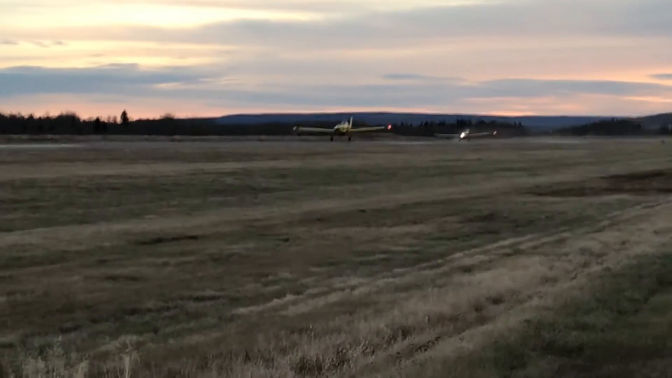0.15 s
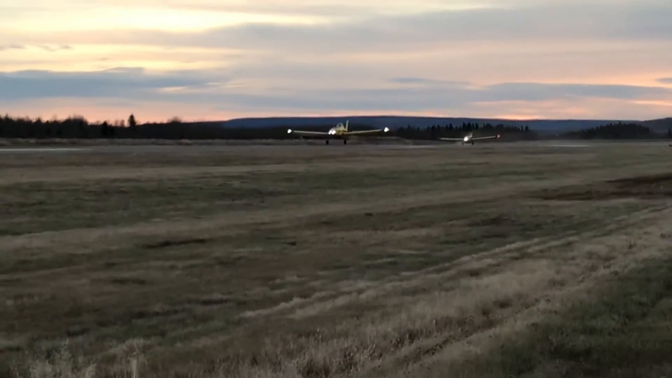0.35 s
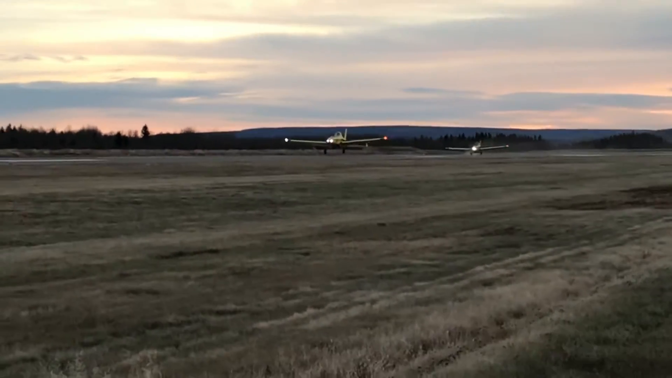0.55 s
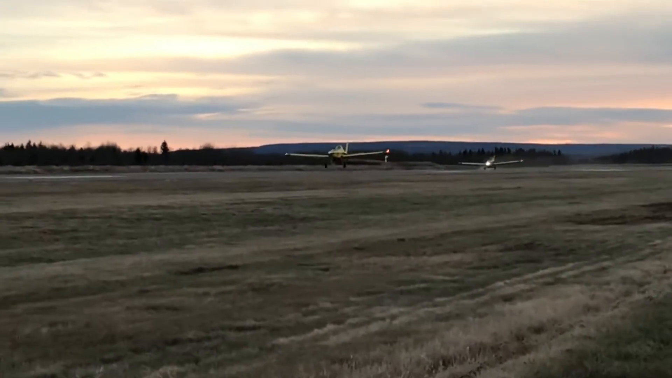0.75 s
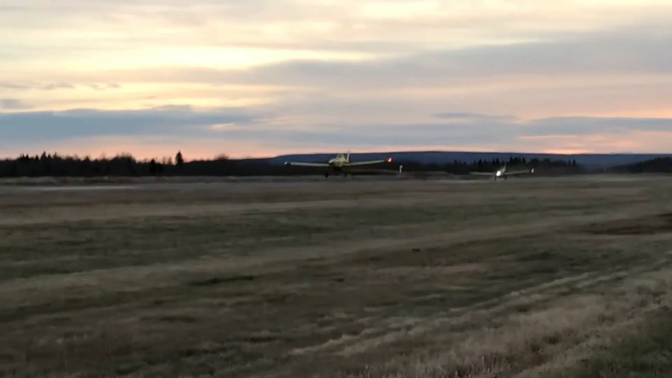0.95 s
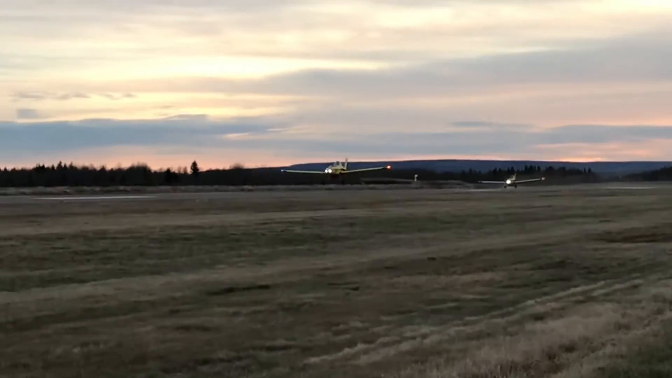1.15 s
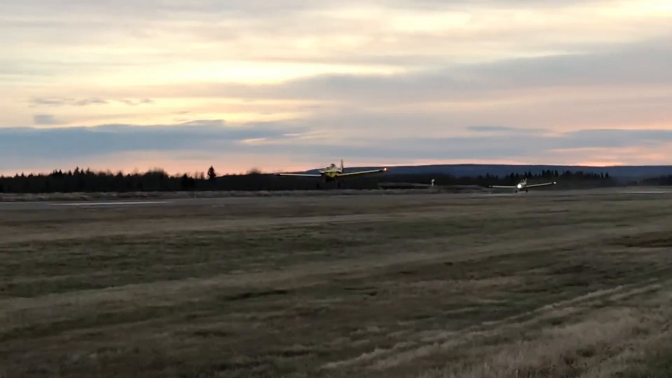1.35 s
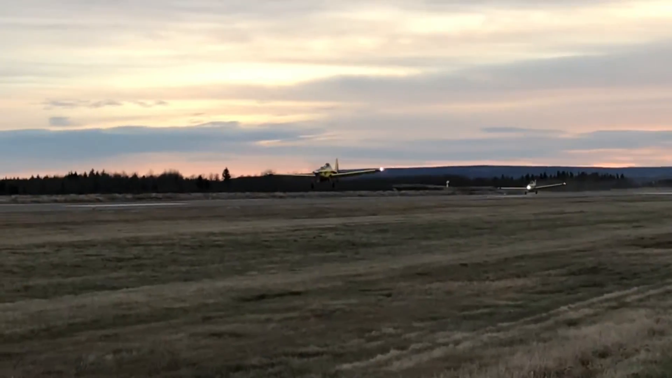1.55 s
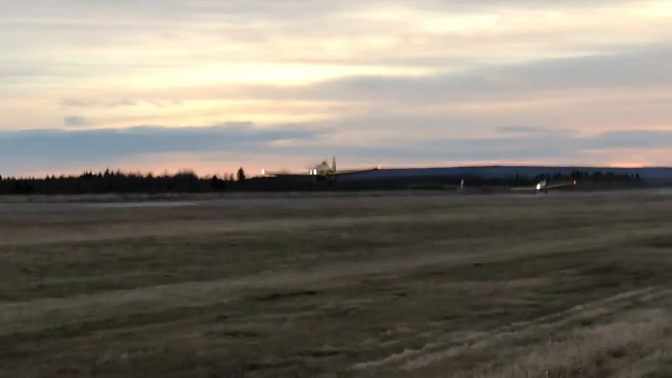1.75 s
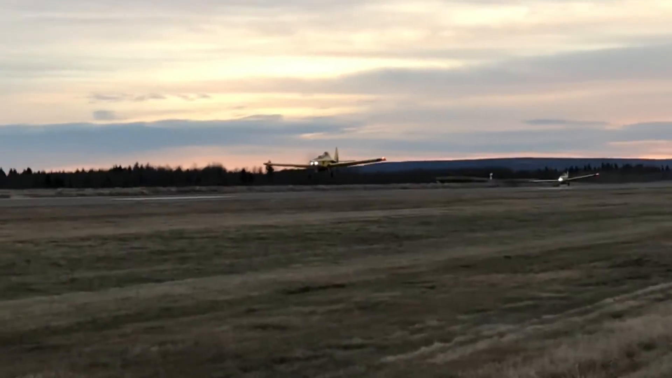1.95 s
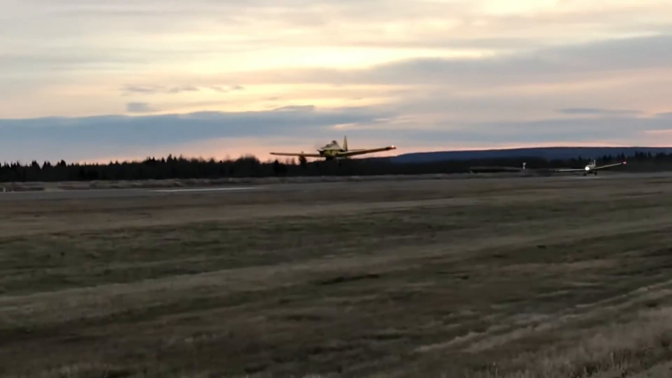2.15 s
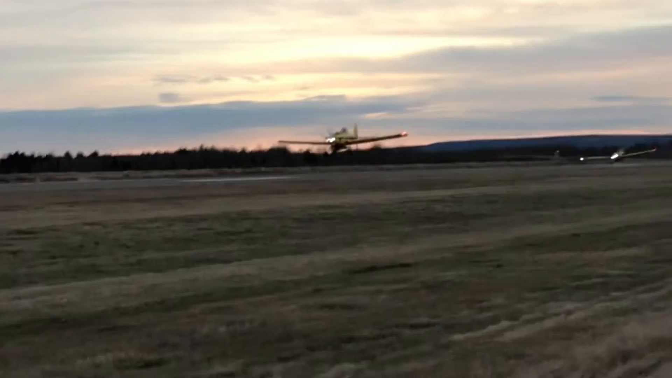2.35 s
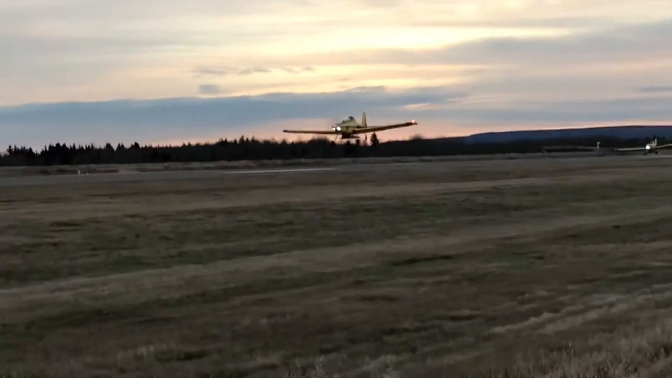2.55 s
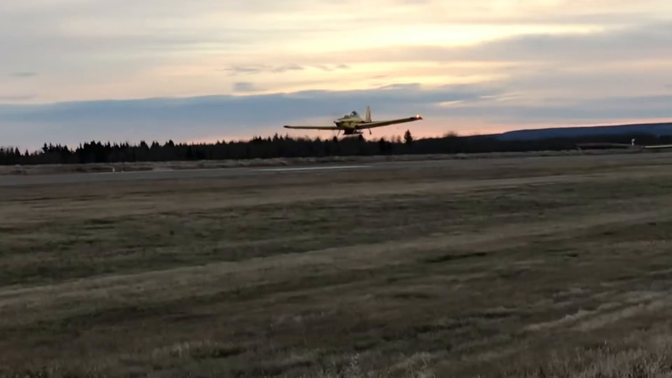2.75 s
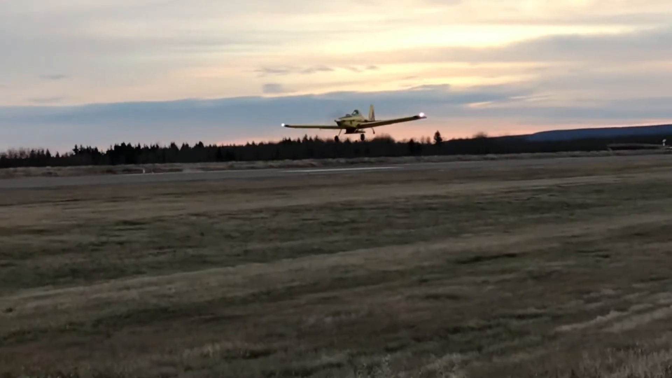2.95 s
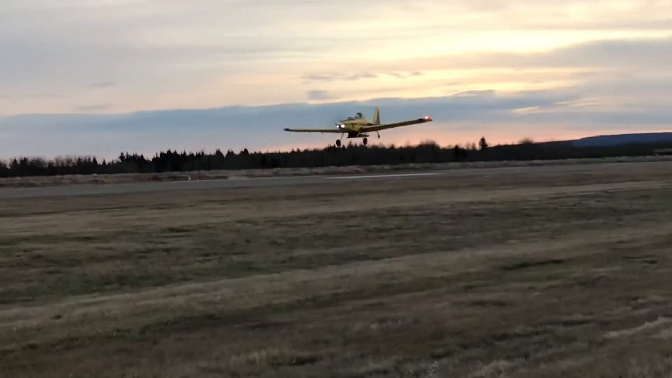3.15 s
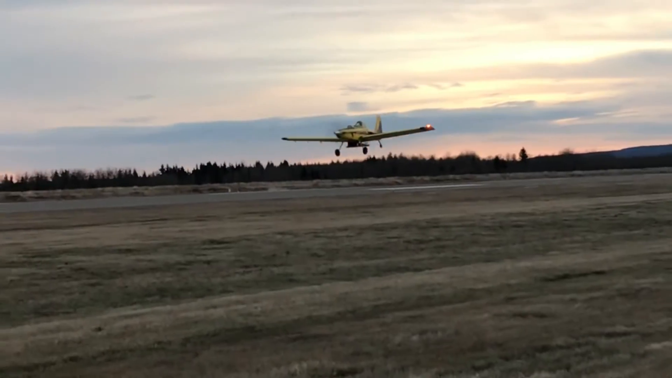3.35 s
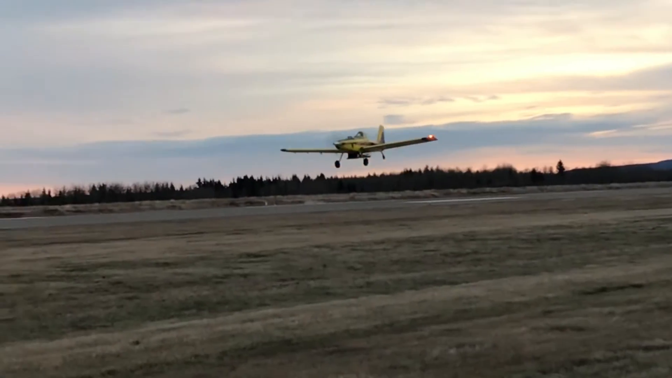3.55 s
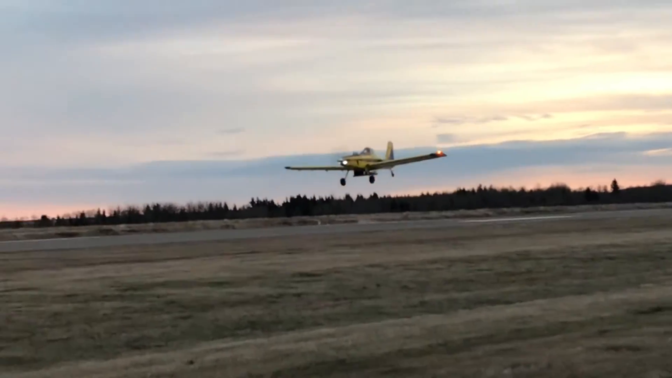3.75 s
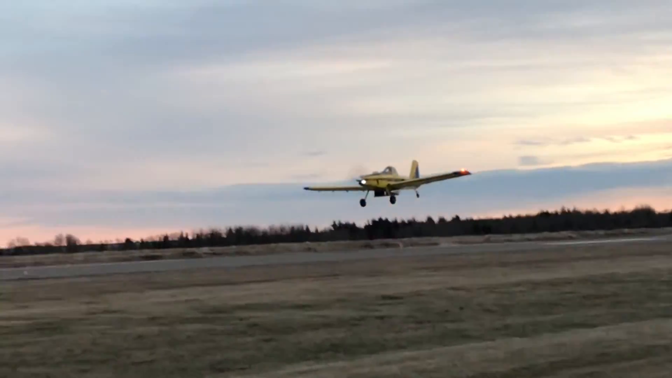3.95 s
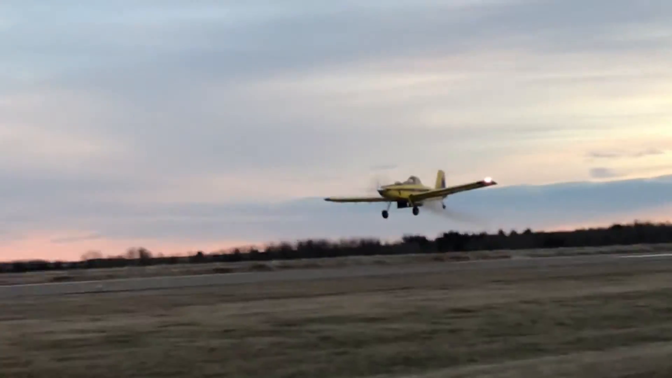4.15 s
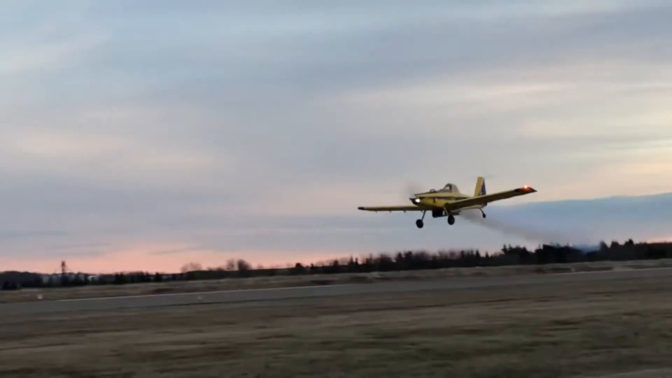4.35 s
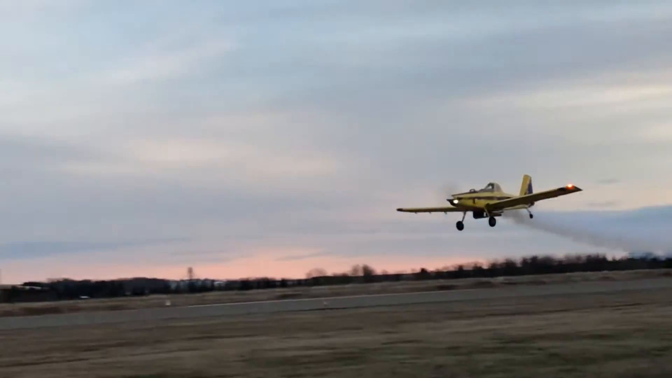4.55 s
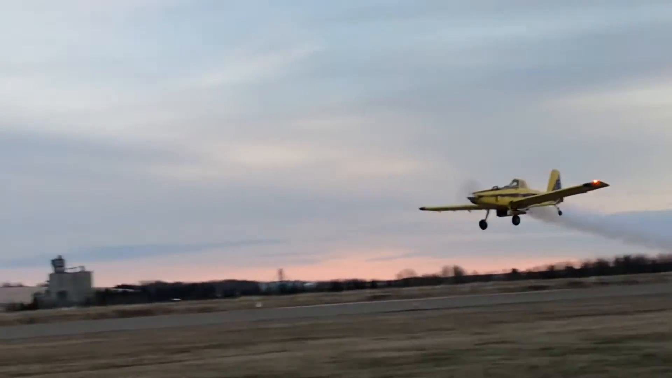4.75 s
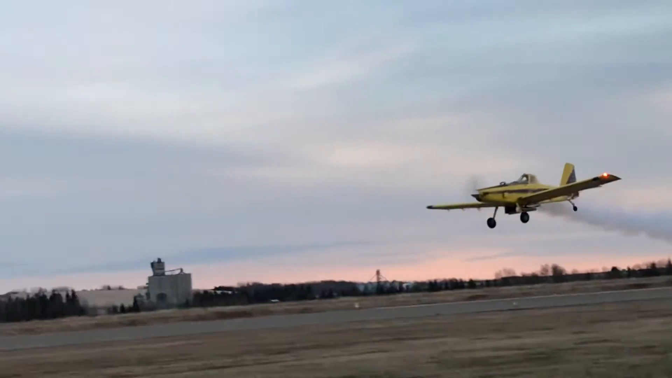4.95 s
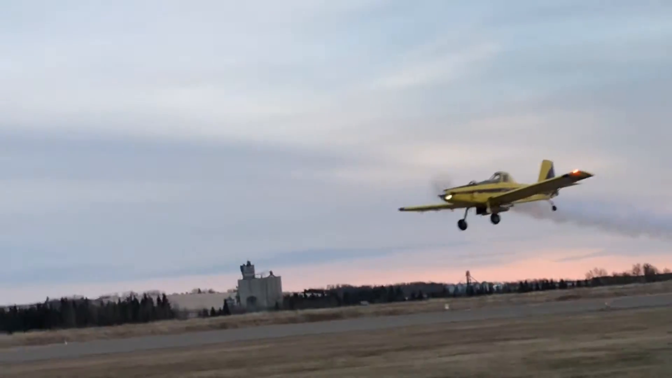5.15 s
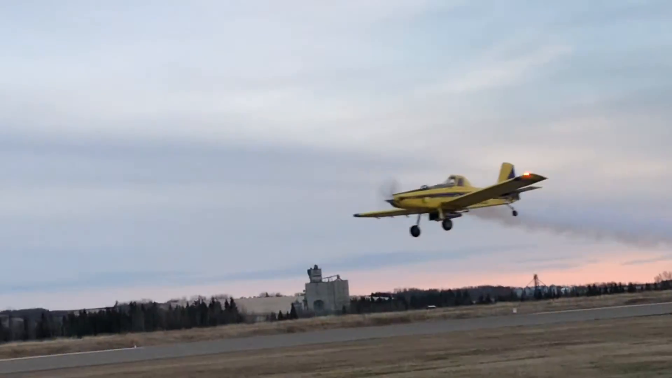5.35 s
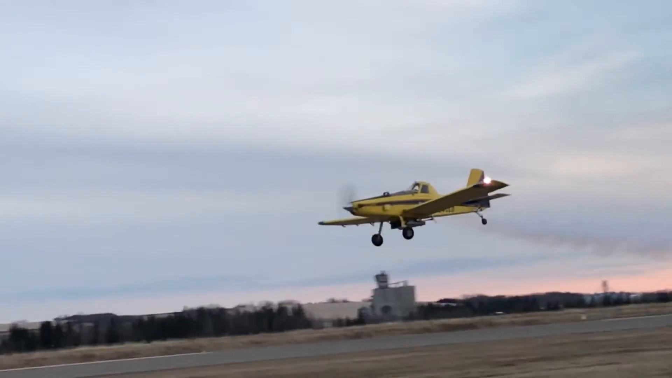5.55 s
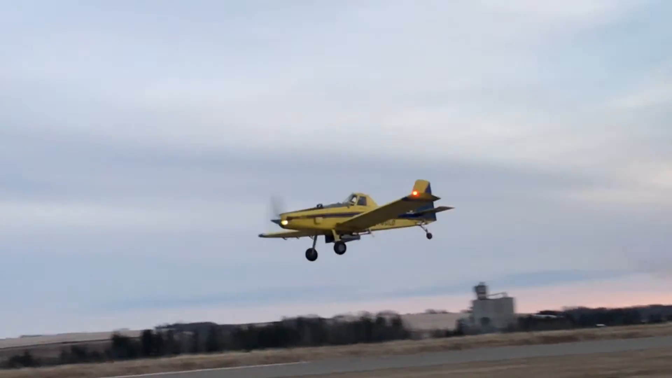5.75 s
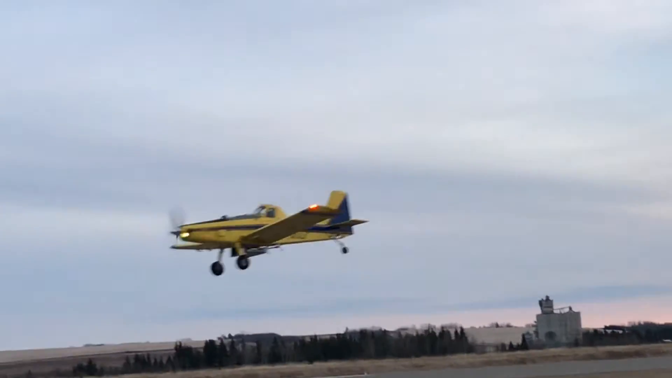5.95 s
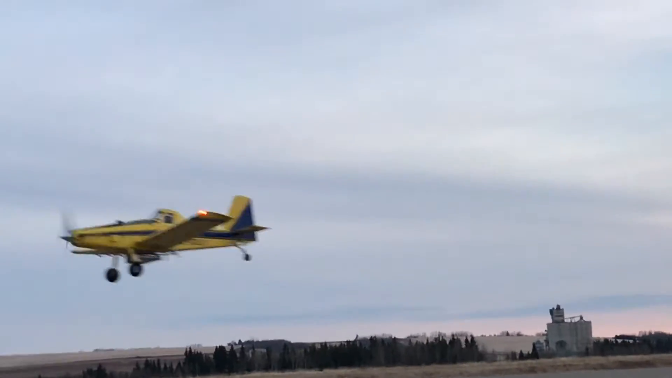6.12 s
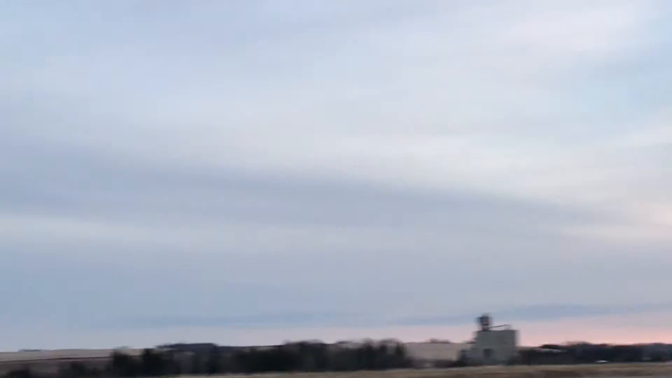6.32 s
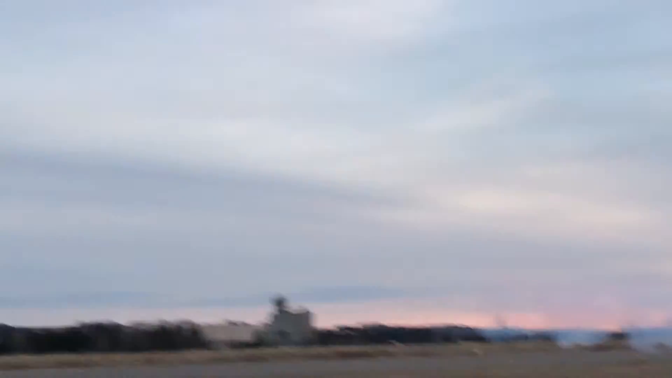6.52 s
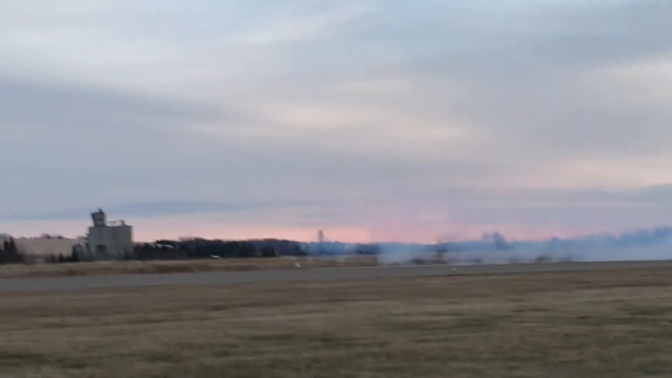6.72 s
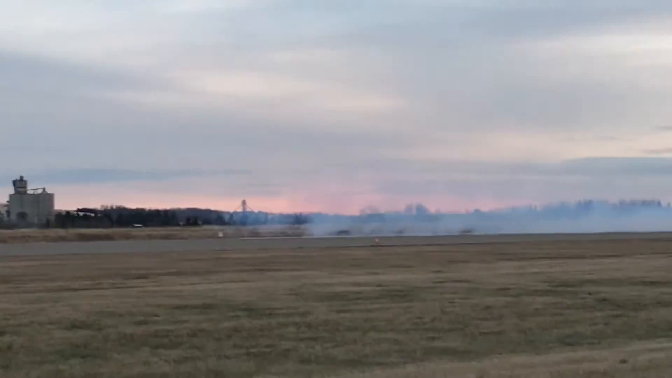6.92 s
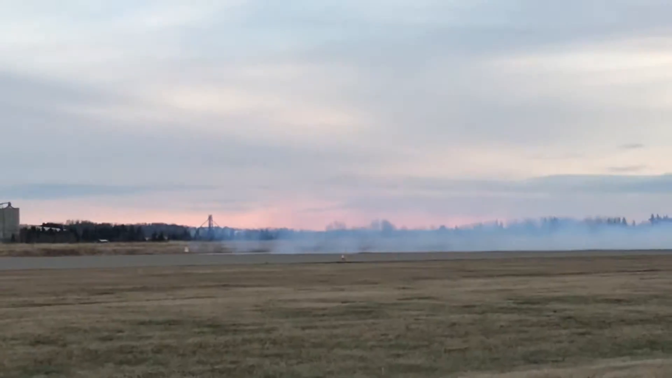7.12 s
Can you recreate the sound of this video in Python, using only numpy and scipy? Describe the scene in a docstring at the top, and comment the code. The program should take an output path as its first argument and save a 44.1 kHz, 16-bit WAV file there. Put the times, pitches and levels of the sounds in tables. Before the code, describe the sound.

From the grass beside an airstrip, a small turboprop aircraft is heard approaching on takeoff. Its low propeller hum swells and fades in the distance under a hollow, whistling rush. The roar grows with a sweeping, phasing colour, joined by hiss and a high compressor whine. In the last seconds the propeller turns into a hard buzz and everything slides down in pitch, loudest as the plane passes the microphone.

```python
"""Crop-duster leaving a grass-edged airstrip

One microphone, 66 m to the side of the flight line. A single-engine turboprop lifts off and passes.
Its propeller drones from afar, then breaks into a buzz as the disc comes side-on, falling in pitch.
Exhaust rumble, airflow roar and compressor whine swell as it nears, with two hollow engine whistles;
two short echoes sweep a comb through the roar."""
import sys
import numpy as np
from scipy import signal
from scipy.fft import rfft, irfft, next_fast_len
from scipy.io import wavfile
from scipy.ndimage import uniform_filter1d

SR = 44100
rng = np.random.default_rng(int(sys.argv[2]) if len(sys.argv) > 2 else 0)


def generate_wav(sig):
    """Save sig (samples, or channels by samples) to the path in sys.argv[1] as 16-bit PCM at SR."""
    pcm = np.round(np.clip(np.atleast_2d(sig).T, -1, 1) * 32767).astype(np.int16)
    wavfile.write(sys.argv[1], SR, pcm)


N = 316638


def from_db(db):
    return 10 ** (np.asarray(db) / 20)


def unit_rms(x):
    return x / np.sqrt(np.mean(np.abs(x) ** 2) + 1e-20)


def steadied(x):
    """The same sound held at an rms of 1."""
    return x / np.sqrt(np.maximum(uniform_filter1d(x * x, size=SR // 5), 1e-20))


def in_time(rows):
    """One curve for each column after the time, with a value for every sample."""
    seconds, *columns = np.transpose(rows)
    return [np.interp(np.arange(N) / SR, seconds, column) for column in columns]


def lowpass(x, hz):
    return signal.sosfilt(signal.butter(2, hz, "low", fs=SR, output="sos"), x)


def coloured(spectrum):
    """Noise of a given spectrum; rms 1."""
    hz, db = np.transpose(spectrum)
    size = next_fast_len(N)
    bins = np.maximum(np.fft.rfftfreq(size, 1 / SR), 1)
    gain = from_db(np.interp(np.log(bins), np.log(hz), db)) * (bins > 10)
    return unit_rms(irfft(rfft(rng.standard_normal(size)) * gain, size)[:N])


def drift(rate_hz):
    """A slow random wander, mostly below this rate; spread 1."""
    pole = np.exp(-40 * np.pi * rate_hz / SR)
    slow = signal.lfilter([1], [1, -2 * pole, pole * pole], rng.standard_normal(N // 20 + 4002))[4000:]
    return np.interp(np.arange(N) / 20, np.arange(len(slow)), unit_rms(slow))


def wavering(phase, width_hz):
    """A tone whose strength and phase wander at random, as through turbulent air; rms 1."""
    noise = rng.standard_normal((2, N // 20 + 1002))
    slow = unit_rms(lowpass(noise, 20 * width_hz)[:, 1000:])
    a, b = (np.interp(np.arange(N) / 20, np.arange(len(part)), part) for part in slow)
    return a * np.cos(phase) + b * np.sin(phase)


ABEAM_S, ABEAM_M = 6.95, 66   # when and how far off the aircraft passes the microphone


def flight(abeam_m_per_s=52, gain_m_per_s2=4):
    """A straight, accelerating run: distance (m), our bearing off the nose (deg), 1/distance (dB)."""
    s = np.arange(N) / SR - ABEAM_S
    to_go = -(abeam_m_per_s * s + .5 * gain_m_per_s2 * s ** 2)
    distance = np.hypot(to_go, ABEAM_M)
    return distance, np.degrees(np.arctan2(ABEAM_M, to_go)), 20 * np.log10(ABEAM_M / distance)


def beam(bearing, centre_deg, width_deg, spill_db):
    """Level (dB) of one radiating lobe, at half power one width off centre, plus an even spill."""
    return 10 * np.log10(.5 ** (((bearing - centre_deg) / width_deg) ** 2) + from_db(spill_db) ** 2)


def buzz_level(follows=2.45):
    """Blade pulses (dB), beamed near the disc's plane; they outgrow 1/distance as it turns to us."""
    _, bearing, near_db = flight()
    return follows * near_db + beam(bearing, centre_deg=76.9, width_deg=19.7, spill_db=-11)


# Blade rate at the microphone, Doppler fall included. Each row: time in seconds, rate in Hz.
BLADE_PASSING = [(0, 142.2), (2.8, 142.3), (3.3, 143.2), (4.5, 142.4), (5, 141.4), (5.5, 139.6), (6, 136.4),
                 (6.5, 132.8), (6.85, 129.1), (7.18, 125.3)]


def blade_phase():
    """One cycle for each passing blade; every pitch of the aircraft follows it."""
    blade_hz, = in_time(BLADE_PASSING)
    return 2 * np.pi * np.cumsum(blade_hz) / SR


# The propeller's fundamental, swelling and fading down the strip. Each row: time in seconds, level in dB.
DRONE_LEVEL = [(0, -46), (.65, -45), (1.05, -29), (2, -29.5), (2.4, -39), (2.9, -30.5), (3.55, -32),
               (4, -37), (4.35, -27.5), (4.95, -17), (5.5, -16), (5.87, -23.5), (6.1, -18.5), (6.6, -19),
               (6.9, -13.5), (7.18, -11.5)]
# Overtones of the blade pulse. Each row: multiple of the blade rate, relative level in dB,
# how steeply it follows the buzz level.
BUZZ_OVERTONES = [(2, -3.5, 1.43), (3, -1.5, 0.94), (4, 1.5, 1.06), (5, -2.5, 1), (6, -7.5, 1.2),
                  (7, -31, 0.79), (8, -17.5, 0.83), (9, -11.5, 1.3), (10, -15.5, 1.1), (11, -27, 1)]


def propeller(phase, buzz_db=-21, jitter_rad=0.014, throb_db=0.88, scatter_db=1.74, turn_rad=2.02):
    """Each blade sends one pressure pulse; gusty air shakes its timing and strength."""
    drone_db, = in_time(DRONE_LEVEL)
    beamed_db = buzz_level()
    phase = phase + jitter_rad * drift(25)
    drone = from_db(drone_db + throb_db * drift(8.5)) * np.cos(phase - turn_rad)
    buzz = 0
    for multiple, db, steepness in BUZZ_OVERTONES:
        level_db = db + steepness * beamed_db + scatter_db * drift(5.7)
        buzz += from_db(level_db) * np.cos(multiple * phase - turn_rad)
    return np.sqrt(2) * (drone + from_db(buzz_db) * buzz)


# Spectrum of the exhaust rumble. Each row: frequency in Hz, relative density in dB.
EXHAUST_SPECTRUM = [(20, -42), (32, -25), (48, -15.5), (64, -2), (80, 0.5), (92, -3.5), (108, 3),
                    (135, 1.5), (150, -10.5), (172, -12), (205, -23), (300, -41), (500, -67.5)]


def exhaust(phase, rumble_db=-26, hum_db=-36.5, hum_multiple=.51, follows=0.48):
    """Combustion rumble from the exhaust stacks, with an unsteady hum in it; levels are those abeam."""
    _, _, near_db = flight()
    rumble = from_db(rumble_db) * steadied(coloured(EXHAUST_SPECTRUM))
    hum = from_db(hum_db) * steadied(wavering(hum_multiple * phase, width_hz=12))
    return from_db(follows * near_db) * (rumble + hum)


def with_echo(x, delay_ms, strength, turn_rad, dull_hz):
    """Adds a moving echo; the reflecting surface turns its phase and soaks up the treble."""
    size = next_fast_len(N)
    surface = np.exp(1j * turn_rad) / np.hypot(1, (np.fft.rfftfreq(size, 1 / SR) / dull_hz) ** 2)
    echo = irfft(rfft(x, size) * surface, size)
    read_at = np.arange(N) - delay_ms * SR / 1000
    return x + strength * np.interp(read_at, np.arange(size), echo)


# The bounce off the ground, strong only at the shallow angles of the approach.
# Each row: bearing off the nose in degrees, strength as a ratio.
GROUND_BOUNCE = [(14, 0.27), (15.5, 0.39), (29, 0.29), (35, 0.27), (43, 0.055), (90, .04)]
# A second path, perhaps off the airframe. Each row: time in seconds, delay in ms, strength as a ratio.
SECOND_PATH = [(0, .77, .46), (1, .69, .56), (4, .78, .8), (4.5, .82, .78), (5, .91, .7), (5.5, 1.14, .42),
               (6, 1.41, .3), (7.18, 1.58, .36)]


def reflections(air, abeam_delay_ms=4.02):
    """Two echoes comb the sound at the microphone; the ground's delay goes as 1/distance."""
    distance, bearing, _ = flight()
    grazing = np.interp(bearing, *np.transpose(GROUND_BOUNCE))
    air = with_echo(air, abeam_delay_ms * ABEAM_M / distance, grazing, turn_rad=2.02, dull_hz=3800)
    return with_echo(air, *in_time(SECOND_PATH), turn_rad=-1.62, dull_hz=2300)


# Roar and hiss as the microphone sees the aircraft: far off nose-on or oblique, then close and side-on.
# Each row: frequency in Hz, relative density in dB.
NOSE_ROAR = [(150, -26), (240, -6.5), (400, -4), (570, -1.5), (800, -7.5), (1000, -5), (1400, -7),
             (1650, -4), (1900, -8.5), (2200, -13.5), (2500, -17.5)]
OBLIQUE_ROAR = [(150, -3), (230, -10.5), (280, 0), (360, 4.5), (550, 1.5), (750, -3), (1200, -3.5),
                (1550, -3.5), (2000, -8), (2250, -11), (2500, -16)]
SIDE_ROAR = [(150, -33), (230, 0.5), (330, 2), (550, 1.5), (720, -1), (920, 0.5), (1180, 2), (1500, -2.5),
             (1850, -11), (2070, -20.5), (2270, -12.5), (2500, -18)]
FAR_HISS = [(2850, -15.5), (3200, -13), (3900, -14.5), (4400, -16.5), (4930, -25), (5400, -20.5),
            (6200, -22.5), (7800, -26.5), (9300, -27.5), (11700, -33.5), (13000, -45), (15500, -51)]
SIDE_HISS = [(2850, -17), (3200, -15), (4000, -17), (4900, -23), (5400, -17), (6200, -23), (7800, -27.5),
             (9300, -27.5), (11700, -29.5), (13000, -40), (15500, -60)]


def turbulence(nose_deg=18, oblique_deg=(23.7, 35), side_deg=70):
    """Noise of blades and exhaust jet, changing colour as the aircraft comes side-on."""
    _, bearing, _ = flight()
    aspect = np.interp(bearing, [nose_deg, *oblique_deg, side_deg], [0.065, 1, 1, 2])
    views = [NOSE_ROAR + FAR_HISS, OBLIQUE_ROAR + FAR_HISS, SIDE_ROAR + SIDE_HISS]
    shares = [np.clip(1 - np.abs(aspect - k), 0, 1) for k in range(len(views))]
    return sum(np.sqrt(share) * coloured(view) for share, view in zip(shares, views))


def swell_bands(frames, hz, bands):
    """Brings each band to its own level in every frame, blending smoothly along frequency."""
    centres = np.log([np.sqrt(low * high) for low, high, _ in bands])
    gain_db = 0
    for own, (low, high, db) in zip(np.eye(len(bands)), bands):
        power = 4 / 3 * np.sum(np.abs(frames[(hz >= low) & (hz < high)]) ** 2, axis=0)
        swell_db = db - 10 * np.log10(uniform_filter1d(power, size=31) + 1e-20)
        gain_db += np.interp(np.log(hz + 1), centres, own)[:, None] * swell_db
    return frames * from_db(gain_db)


# The treble comes and goes across the field. Each row: time in seconds, level in dB before the trim.
HISS_LEVEL = [(0.06, -52), (0.18, -55.5), (0.57, -52), (0.79, -57), (1.08, -51), (1.46, -53.5),
              (2.18, -46.5), (2.73, -51.5), (2.91, -47.5), (3.7, -41), (4.56, -45.5), (5.5, -42),
              (7.04, -38.5), (7.12, -38.5)]
# Treble lost through the air and over the grass on its way to the microphone.
# Each row: time in seconds, downward tilt in dB per kHz above 3.4 kHz.
TREBLE_LOSS = [(0, 3.5), (1.6, 4.5), (2.95, 3.5), (3.4, 4.5), (3.7, 3), (4.5, 1.5), (5.1, 1), (6.2, .25),
               (7.18, 1.3)]


def airflow(phase, climb_s=3.08, climb_takes_s=0.33, chop=0.096, hiss_trim_db=-0.4):
    """The turbulence swells as low wash, roar and hiss; its treble arrives as the distance shrinks."""
    _, bearing, near_db = flight()
    # the grass swallows the wash until the aircraft climbs clear
    over_grass = .5 - .5 * np.tanh((np.arange(N) / SR - climb_s) / (2 * climb_takes_s))
    wash_db = -26 + 0.37 * near_db - 11.5 * over_grass
    # the roar weakens once the nose has gone by
    aft_deg = np.maximum(bearing - 84.7, 0)
    roar_db = -27.5 + 0.63 * near_db - 0.38 * aft_deg
    hiss_db = in_time(HISS_LEVEL)[0] + hiss_trim_db
    loss_db_per_khz = in_time(TREBLE_LOSS)[0] + 0.18 * drift(8)   # the treble flickers
    hz, seconds, frames = signal.stft(reflections(turbulence()), SR, nperseg=512, boundary="even")
    at = np.minimum((seconds * SR).astype(int), N - 1)
    frames = frames * from_db(-loss_db_per_khz[at] * np.maximum(hz[:, None] - 3400, 0) / 1000)
    bands = [(250, 900, wash_db[at]), (900, 1900, roar_db[at]), (2600, 4600, hiss_db[at])]
    air = signal.istft(swell_bands(frames, hz, bands), SR)[1][:N]
    # side-on, the lower roar pulses with each passing blade
    pulsing = chop * from_db(buzz_level()) * np.cos(phase)
    return air + pulsing * lowpass(air, 1800)


# The lower whistle, heard only on the approach. Each row: time in seconds, level in dB.
LOW_WHISTLE_LEVEL = [(0, -54), (.6, -59), (1.05, -46), (1.5, -53), (2.7, -62), (3.3, -48), (4, -45),
                     (5, -74)]


def whistles(phase, low_multiple=15.2, high_multiple=23.7, high_abeam_db=-46):
    """Two hollow engine whistles fall with the propeller's pitch; the upper grows as the plane nears."""
    _, _, near_db = flight()
    low_db, = in_time(LOW_WHISTLE_LEVEL)
    low = from_db(low_db) * wavering(low_multiple * phase, width_hz=80)
    high = from_db(high_abeam_db + 1.6 * near_db) * wavering(high_multiple * phase, width_hz=140)
    return low + high


WHINE_MULTIPLES = (74.85, 88.85)   # of the blade rate
# The two compressor tones. Each row: level in dB at the passing distance before beaming, loss in dB per
# metre, beam angle off the nose and half-width in degrees, spill in dB, lean of the sidebands in steps.
COMPRESSOR_TONES = [(-50, .175, 59, 8, -5.5, .6), (-56, .32, 95, 8, -6.5, -.1)]


def compressor(phase, multiple, tone, flutter_db=1.5, nose_step_db=14, side_step_db=2.5):
    """A blade-row tone that the propeller chops into sidebands one blade rate apart, more side-on."""
    db, db_per_m, centre_deg, width_deg, spill_db, lean = tone
    distance, bearing, _ = flight()
    level_db = db - db_per_m * (distance - ABEAM_M) + beam(bearing, centre_deg, width_deg, spill_db)
    level_db += flutter_db * drift(12)
    step_db = nose_step_db + (side_step_db - nose_step_db) * np.sin(np.radians(bearing)) ** 2
    steps = range(-5, 6)
    shares = [from_db(-step_db * abs(k - lean)) for k in steps]
    lines = sum(share * wavering((multiple + k) * phase, width_hz=18) for k, share in zip(steps, shares))
    # the whine comes through at 2.85 s, as the aircraft lifts clear of the ground
    clear = np.clip((np.arange(N) / SR - 2.85) / .08, .05, 1)
    return clear * from_db(level_db) * lines / np.linalg.norm(shares, axis=0)


def scene(floor_db=-79):
    """The aircraft from beside the strip, over a faint even hiss."""
    phase = blade_phase()
    tones = zip(WHINE_MULTIPLES, COMPRESSOR_TONES)
    whine = sum(compressor(phase, multiple, tone) for multiple, tone in tones)
    floor = from_db(floor_db) * rng.standard_normal(N)
    return (propeller(phase) + airflow(phase) + exhaust(phase) + whistles(phase) + whine + floor)[None]


def record(dry, cutoff_hz=15700, fade_s=0.0023):
    """One channel, its top cut steeply and its ends softened."""
    s = np.arange(N) / SR
    ends = np.clip(np.minimum(s, s[-1] - s) / fade_s, 0, 1)
    return ends * signal.sosfilt(signal.ellip(10, .1, 80, cutoff_hz, fs=SR, output="sos"), dry)


dry = scene()
out = record(dry)
generate_wav(out)
```